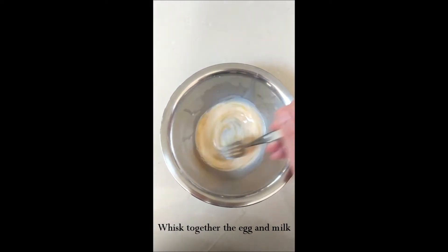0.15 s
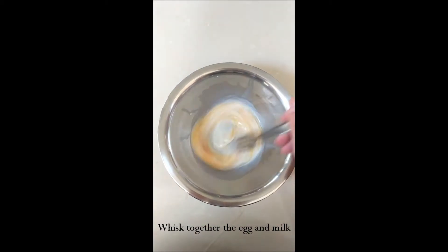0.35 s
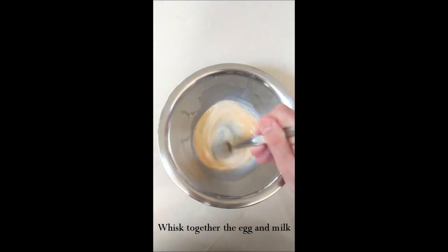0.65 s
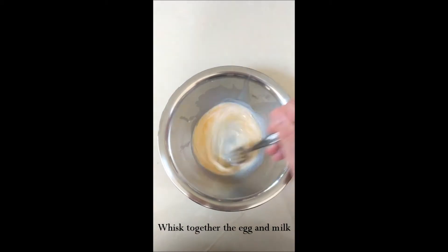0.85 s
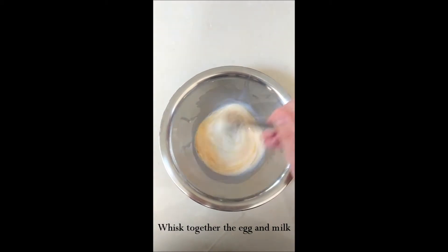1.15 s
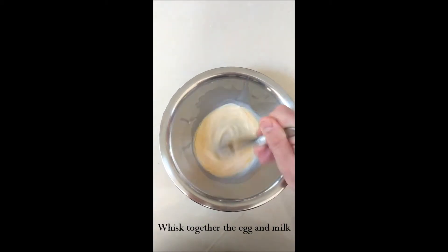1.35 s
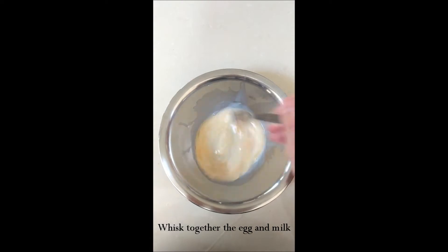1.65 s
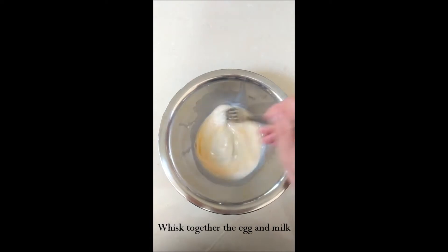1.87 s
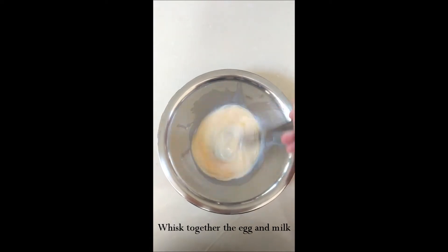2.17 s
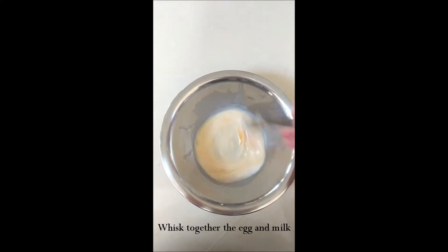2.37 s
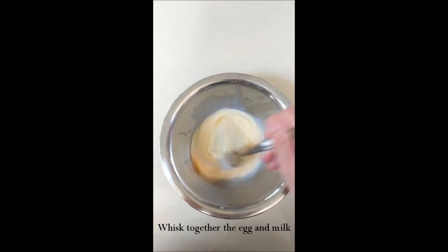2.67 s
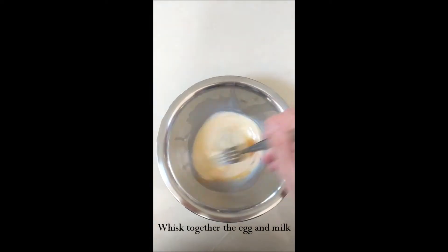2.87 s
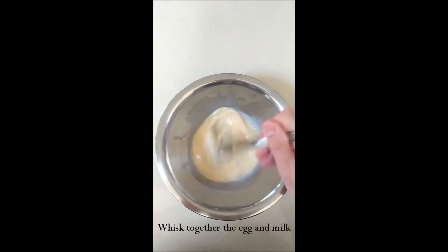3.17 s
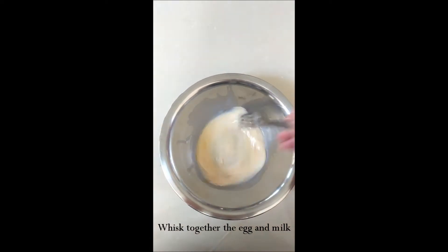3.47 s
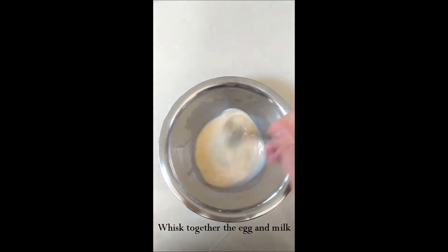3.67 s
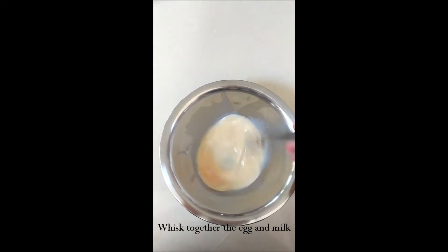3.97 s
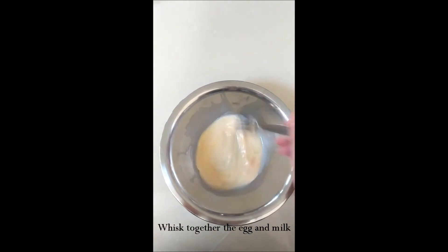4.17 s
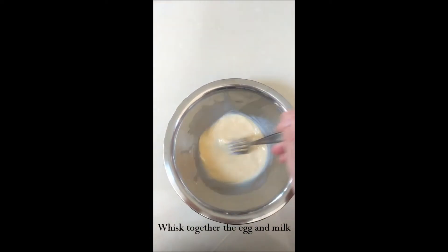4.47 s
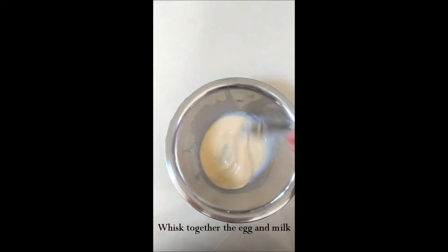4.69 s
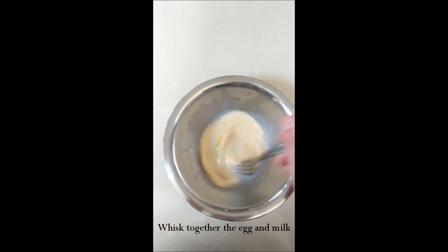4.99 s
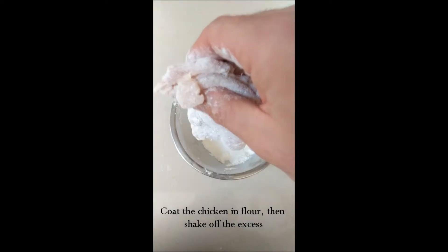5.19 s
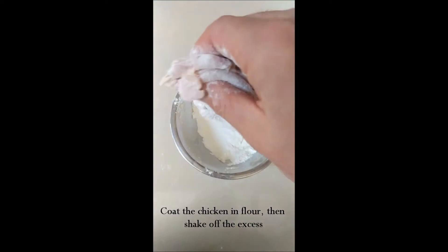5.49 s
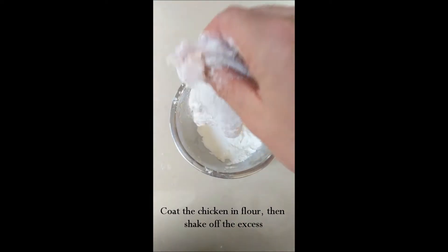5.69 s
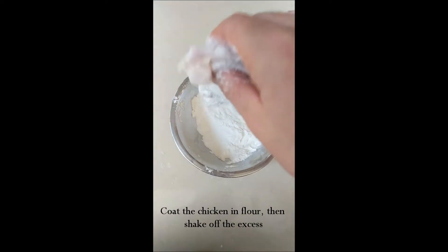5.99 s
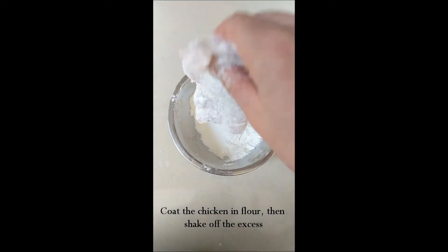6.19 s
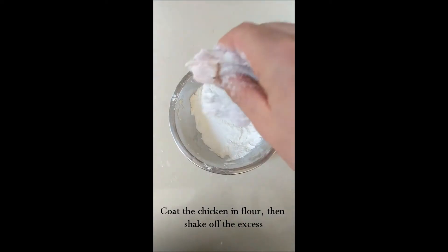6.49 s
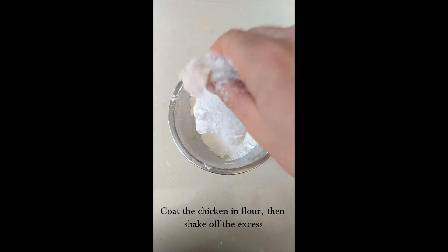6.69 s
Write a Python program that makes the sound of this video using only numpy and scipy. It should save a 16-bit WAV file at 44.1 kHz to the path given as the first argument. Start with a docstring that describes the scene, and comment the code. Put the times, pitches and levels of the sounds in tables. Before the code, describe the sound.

A fork whisks egg and milk fast in a steel bowl, bright tinny clicks and wet sloshing, then stops abruptly into faint room hum.

```python
"""Whisking egg in a steel bowl

A fork whisks egg and milk in a kitchen, close to the microphone, about five and a half turns a second.
The tines clatter on the wall as ringing modes; each sweep fizzes and sloshes with noise and bubbles.
The bowl thuds on the worktop as low fading sines, over a rumble, and the walls answer faintly.
The whisking breaks off abruptly, the level dips briefly and only air and appliance hum are left."""
import sys
import numpy as np
from scipy import signal
from scipy.fft import rfft, irfft, next_fast_len
from scipy.io import wavfile
from scipy.ndimage import uniform_filter1d, map_coordinates

SR = 44100
rng = np.random.default_rng(int(sys.argv[2]) if len(sys.argv) > 2 else 0)


def pcm_store(signal):
    """Save signal as 16-bit PCM."""
    levels = np.round(np.clip(np.atleast_2d(signal), -1, 1) * 32767)
    wavfile.write(sys.argv[1], SR, levels.astype(np.int16).T)


N = 301642

STOP_S, RESUME_S = 5.197, 5.244  # the whisking ends; the dip in the room tone ends
TOP_HZ = 15900  # upper band limit
RING_GROWTH = 1  # dB more ring for each dB of a harder blow

# tines strike the wall: (t/s, relative level/dB of bright ring, mid clack, low knock,
# centre f/Hz of ring, of clack)
CONTACTS = [(0.0064, -16, -24.5, -42, 7900, 2350), (0.042, -14, -29, -43.5, 9500, 2820),
            (0.1228, -14.5, -39, -53.5, 10660.0, 2590.0), (0.1416, -26, -38.5, -47.5, 9880.0, 2830.0),
            (0.1687, -20.5, -36, -46.5, 7800, 2130), (0.1974, -29, -38, -49.5, 10670.0, 2040),
            (0.2262, -27, -39, -61, 11110.0, 2420.0), (0.293, -28, -34, -52, 10690.0, 2310),
            (0.3218, -9, -31, -45, 10470.0, 1850), (0.3505, -20.5, -27.5, -47, 10670.0, 1840.0),
            (0.4034, -17, -34, -55, 11000, 2330.0), (0.4758, -29.5, -34, -46.5, 10570.0, 2130),
            (0.5352, -15, -23, -44.5, 11030, 1860), (0.586, -17, -34.5, -51, 9410.0, 2540),
            (0.676, -17, -34.5, -42, 9610.0, 2280.0), (0.7167, -12.5, -33.5, -51.5, 8000, 1990.0),
            (0.754, -24.5, -37, -50, 10710.0, 2050), (0.7667, -14.5, -32, -50.5, 9100, 2370),
            (0.8566, -29, -30.5, -54.5, 9550.0, 2550), (0.924, -15.5, -38.5, -45, 10760, 2590),
            (0.9386, -22.5, -35.5, -54.0, 9140.0, 2580), (1.0129, -27.5, -34, -46, 11370.0, 2620),
            (1.038, -19, -36.5, -49, 7580, 2150), (1.1044, -20.5, -35, -48.5, 11540.0, 2400),
            (1.1827, -22.5, -28.5, -62, 10230.0, 2640), (1.199, -27.5, -35.5, -51.5, 9570.0, 2490),
            (1.2276, -26, -39.5, -46, 7170.0, 2010), (1.282, -20, -32.5, -41, 7700, 2240),
            (1.2951, -17.5, -35.5, -49, 7500, 2015), (1.3762, -27.5, -39.5, -53.5, 9880, 2700.0),
            (1.433, -18.5, -36.5, -52, 10600, 2200), (1.4369, -7, -28.5, -51, 10610.0, 2130),
            (1.48, -16.5, -32.5, -52, 9610, 2460), (1.5227, -17, -39, -48, 9780.0, 2543),
            (1.5562, -5.5, -29, -45.5, 7550, 2730), (1.5778, -21.5, -29, -43, 10220.0, 2030),
            (1.639, -26.5, -35, -46, 10680, 2100), (1.653, -18, -34, -49, 7720, 2385),
            (1.7225, -39, -34, -45, 8900, 2100), (1.7543, -12.5, -31, -48, 6560, 1770.0),
            (1.7811, -15, -24, -42, 10280, 2060), (1.8249, -19, -42.5, -48.5, 9680, 2730),
            (1.9092, -28.5, -37, -48, 7360.0, 2157), (1.94, -17, -34.5, -45, 6900, 1730),
            (1.9484, -25, -29, -62.5, 6910.0, 2850), (2.0873, -22, -30, -36.5, 7310.0, 2380),
            (2.099, -7.0, -27.5, -44.5, 8000, 2960.0), (2.125, -15, -33, -46, 10630.0, 2020),
            (2.142, -23.5, -39, -60.5, 10640.0, 2790.0), (2.164, -20.5, -39, -49, 9860, 2740),
            (2.2637, -28.5, -37, -48, 10140.0, 2460), (2.3013, -17, -38, -61.5, 7500, 2280.0),
            (2.3339, -17.5, -30.5, -46.5, 9700, 2150), (2.3508, -18, -29.5, -40, 7300, 2030),
            (2.4629, -10, -31, -46, 10420.0, 1814), (2.519, -12, -27, -44, 7350.0, 2620),
            (2.539, -15, -40, -46.5, 8700, 2390.0), (2.6195, -16.5, -39, -49, 10550.0, 2560.0),
            (2.638, -23.5, -36.5, -49.5, 10600, 2630), (2.6977, -15.5, -22, -44, 10690.0, 2042),
            (2.7357, -17, -35, -47.5, 6090.0, 2420), (2.8156, -24.5, -33, -39.5, 9880.0, 2130.0),
            (2.848, -14.5, -37, -49.5, 6810, 1690), (2.8902, -7, -22.5, -24, 9870, 1800),
            (2.9317, -21, -39, -49.5, 9710, 2900), (3.0098, -6.5, -29.5, -39.5, 10280.0, 1830.0),
            (3.0521, -19.5, -30, -46.5, 7620, 2070), (3.092, -22.5, -41.5, -47.5, 9750.0, 2510.0),
            (3.1851, -24, -34, -50.5, 9980.0, 2350), (3.2013, -7, -24.5, -45.5, 10380.0, 1930),
            (3.2217, -16.5, -26, -41.5, 10620.0, 1992), (3.257, -17, -29.5, -45, 9510, 2380),
            (3.266, -17, -32.5, -49.5, 9500, 2370), (3.3475, -25, -33.5, -43.5, 10720.0, 2480.0),
            (3.3667, -10.5, -26.5, -48, 10340.0, 2870), (3.3802, -14.5, -35.5, -43.5, 7340.0, 2060),
            (3.3977, -18, -33.5, -61.5, 10500, 2046), (3.4285, -24, -29, -45.5, 9570.0, 2920.0),
            (3.439, -17.5, -37, -50, 7600.0, 2690.0), (3.524, -27, -30, -40, 10570.0, 3180),
            (3.538, -10.5, -32.5, -46, 7350.0, 2000), (3.5579, -14.5, -28.5, -35.5, 7460.0, 1843),
            (3.598, -18.5, -27, -42, 9080, 2860.0), (3.6128, -8, -25.5, -28.5, 7040, 2030),
            (3.7, -19.5, -25.5, -41, 9130, 2330), (3.717, -12, -34, -45, 7850, 2100.0),
            (3.7764, -17, -30, -46, 7640, 2213), (3.7876, -12.5, -27.5, -36, 10650.0, 2012),
            (3.8785, -24, -29, -44, 9910.0, 2440), (3.8937, -7.5, -32, -40.5, 7490.0, 3017),
            (3.929, -18, -29.5, -48.5, 10660.0, 2270), (3.9583, -18, -28, -43.5, 10720, 2308),
            (3.978, -24.5, -36.5, -51, 9180, 2210.0), (4.0639, -25, -31, -54, 7600, 3100),
            (4.0823, -8.5, -32.5, -44.5, 10370.0, 1800), (4.122, -15.5, -25, -46, 10620.0, 2020),
            (4.146, -15, -26, -46, 9820.0, 2420), (4.1629, -20.5, -32, -53, 10690, 2117),
            (4.171, -32, -34.5, -59.5, 7450.0, 1990), (4.2434, -25.5, -36, -47.5, 10010.0, 2230.0),
            (4.2626, -6, -28.5, -46, 6920.0, 2020), (4.3066, -20.5, -24.5, -54, 10730.0, 3130),
            (4.3468, -19, -33.5, -50, 9150.0, 2837), (4.448, -7, -27.5, -43, 10600, 3030),
            (4.488, -12.5, -21.5, -38.5, 10710.0, 2800), (4.5999, -8.0, -29, -48, 10300.0, 2995),
            (4.653, -18, -26, -45.5, 10490.0, 2090.0), (4.7797, -21, -29.5, -47.5, 7480, 1880.0),
            (4.7881, -7.5, -24, -40, 7480.0, 3120), (4.8328, -19.5, -26.5, -44, 10830.0, 1970),
            (4.8554, -24, -38, -47, 9890.0, 2810.0), (4.8657, -16.5, -34, -48, 9750.0, 2780.0),
            (4.9603, -25.5, -32, -49.5, 7130.0, 2260), (4.9684, -7.5, -25.5, -41, 7150, 1947),
            (5.006, -12, -25, -42, 7330.0, 2000), (5.038, -17.5, -32, -42.5, 9490.0, 2900),
            (5.0521, -18.5, -28, -36.5, 7350.0, 2860), (5.1505, -28, -37, -48, 9140, 2400),
            (5.179, -24.5, -35, -41, 10580.0, 2030)]
# short clink of tines on steel, before random shifts: (f/Hz, relative level/dB, t60/s)
CLINK = [(330, -9, .018), (400, -2, .022), (640, -7, .012), (810, -2.5, .018), (890, 0, .02),
         (1000, -3, .014), (1350, -7, .025), (1450, -10, .025), (1700, -5, .025), (1860, -4.5, .02),
         (2030, -1.5, .02), (2300, -2, .015), (2700, -2, .015), (3020, 0, .02), (4160, -8, .02),
         (6370, -4.5, .02), (6880, -3, .018), (7050, -3, .018), (7200, -2, .02), (7500, 0, .022),
         (8380, -9, .02), (8980, -7, .02), (9550, -8, .015), (10150, -1, .018), (10380, 2, .022),
         (10560, 0, .022), (12480, -7, .018), (13280, -5, .018), (14700, -3, .015)]
# free ringing of the loaded bowl: (f/Hz, relative level/dB, t60/s)
BOWL = [(421, -18, 1.1), (862, -23.5, .26), (985, -24, .3), (1340, -26, .15), (1435, -23, .2),
        (1660, -18.5, .32), (1770, -25, .2), (2005, -23, .12), (5445, -25, .09), (6382, -25, .07),
        (7175, -21, .1), (7512, -14, .12), (7715, -19, .11), (8978, -22, .09), (9515, -20, .1),
        (9880, -20, .06), (10640, -15, .09), (11030, -20, .06)]
# bright ring, mid clack, low knock: (lowest f/Hz, highest f/Hz)
REGISTERS = [(5400, 14800), (1300, 4100), (320, 1050)]
# free ring of the bowl against a usual blow: (bright level/dB, mid level/dB, low level/dB)
RING_LEVEL_DB = (-2, -1.5, -1.5)
# extra force beyond which a blow adds no more ring: (bright level/dB, mid level/dB, low level/dB)
RING_CAP_DB = (13, 8, 6)
# change of the ring at the next contact: (bright level/dB, mid level/dB, low level/dB)
PRESS_DB = (-1, -5, 0)
# the fork leaves the wall: (t/s, gain of low modes/dB, gain of mid modes/dB, time free/s)
REBOUNDS = [(0.324, -39, -23, 0.14), (0.537, -46, -22, 0.097), (.755, -42, -30, 0.067),
            (2.849, -37, -18.5, .01), (2.89, -23.5, -19.5, 0.43), (3.614, -36.5, -33.5, 0.045),
            (4.488, -42.5, -25, 0.039)]
# sweeps through the mix: (middle t/s, half length/s, relative fizz level/dB, relative slosh level/dB)
SWEEPS = [(0.037, 0.016, -30.5, -37.5), (0.132, 0.012, -33.5, -37.5), (0.211, 0.017, -34.5, -40.5),
          (0.29, 0.013, -32.5, -37), (0.388, 0.023, -34.5, -41.5), (0.477, 0.012, -30, -39),
          (0.572, 0.023, -34.5, -43), (0.673, 0.015, -31.5, -39.5), (0.747, 0.023, -35, -43),
          (0.85, 0.016, -35, -40), (0.92, 0.017, -31.5, -37), (1.002, 0.011, -36, -39.5),
          (1.095, 0.025, -33.5, -39), (1.192, 0.012, -32.5, -42), (1.282, 0.014, -30.5, -43),
          (1.373, 0.014, -32.5, -40), (1.454, 0.012, -32, -42), (1.55, 0.023, -33, -41),
          (1.636, 0.014, -37, -39.5), (1.72, 0.011, -33, -38), (1.811, 0.016, -36, -41),
          (1.898, 0.016, -33.5, -42), (1.989, 0.016, -32.5, -42), (2.068, 0.01, -33.5, -44.5),
          (2.15, 0.023, -34, -43.5), (2.248, 0.014, -35, -37.5), (2.335, 0.016, -34, -40.5),
          (2.439, 0.013, -28, -38.5), (2.523, 0.017, -37, -37), (2.625, 0.012, -33.0, -40),
          (2.71, 0.011, -34, -46), (2.809, 0.011, -34, -44), (2.888, 0.02, -40.5, -55),
          (2.974, 0.022, -39.5, -41), (3.091, 0.015, -33, -42.5), (3.176, 0.012, -34.5, -41),
          (3.249, 0.018, -35.5, -39), (3.34, 0.009, -31.5, -42.5), (3.42, 0.015, -31, -41),
          (3.522, 0.017, -36.5, -38), (3.596, 0.021, -35.5, -40), (3.705, 0.017, -35, -38),
          (3.767, 0.021, -34.5, -43), (3.878, 0.019, -34.5, -39), (3.963, 0.014, -35, -40.5),
          (4.045, 0.008, -35, -42.5), (4.15, 0.017, -41, -46), (4.231, 0.01, -35.5, -41.5),
          (4.33, 0.013, -38.5, -43), (4.416, 0.012, -36.5, -42), (4.516, 0.02, -37.5, -39),
          (4.599, 0.014, -33.5, -57), (4.681, 0.014, -36.5, -43.5), (4.755, 0.008, -33.5, -43),
          (4.862, 0.012, -36.5, -38), (4.96, 0.018, -39.5, -44), (5.037, 0.016, -34.5, -41),
          (5.135, 0.013, -36.5, -40)]
# the fork flies clear of the mix: (landing t/s, time in the air/s, change of liquid level/dB)
LIFTS = [(.535, 0.033, -25.5), (1.754, 0.014, -23), (1.781, .018, -13), (2.462, 0.03, -27),
         (2.519, 0.06, -11.5), (2.699, .04, -33.5), (2.848, 0.0192, -13.5), (2.89, .03, -30.5),
         (4.083, 0.016, -12), (4.122, .028, -13), (4.306, 0.035, -19), (4.488, 0.035, -23.5),
         (4.6, .028, -17), (4.653, .032, -19), (4.833, .025, -3)]
# colour of the bursting foam: (f/Hz, relative level/dB)
FIZZ = [(2500, -30), (3800, -18.5), (4800, -25), (5450, -9), (6500, -11), (7400, -7.5), (8200, -4),
        (9800, 3), (10200, -3.5), (10750, 5), (11600, -1), (12900, -4.5), (14300, -3), (15300, -10),
        (16000, -14.5)]
# colour of the folding liquid: (f/Hz, relative level/dB)
SLOSH = [(90, -16), (160, -1), (380, -27.5), (560, -21.5), (900, -13.5), (1170, -24.5), (1600, -6),
         (2200, 0), (2650, 0.5), (3300, 0), (4000, -15), (4800, -13), (6500, -41.5)]
# colour of the gritty swish of the tines: (f/Hz, relative level/dB)
GRIT = [(1500, -24.5), (3000, -2), (4200, -0.5), (5200, -4), (9000, -3.5), (15000, -8)]
# a skidding tine squeaks: (middle t/s, f/Hz, level/dB, half length/s)
SQUEAKS = [(0.201, 10640, -33, 0.008), (0.577, 9600, -37, 0.0062), (0.66, 10930, -31, .009),
           (0.746, 10670, -28.5, .008), (1.463, 10650, -26, 0.0037), (1.635, 10640, -35, 0.014),
           (1.806, 10600, -35.5, 0.0079), (2.719, 10750, -39, 0.0098), (3.748, 10610, -38, .007),
           (3.968, 10560, -33, 0.0033), (4.331, 9700, -43, .009), (4.333, 10800, -35, 0.008),
           (4.686, 10000, -34.5, .004), (4.688, 11600, -36.5, .006), (4.704, 10700, -37, .005)]
# large air pockets: (t/s, starting f/Hz, peak level/dB, swell/s, t60/s, pitch rise/octaves per s,
# waver/share of pitch)
GULPS = [(.276, 904, -39.5, 0.0044, 0.065, -3, .04), (.289, 2190, -36, 0.0047, 0.033, 4, .036),
         (.614, 2350, -31.5, 0.0013, .041, 1, .022), (.645, 2580, -36, .0043, 0.042, 6, .036),
         (.69, 2580, -29.5, .003, 0.026, 1, .019), (.825, 2584, -35, 0.008, .067, 2.5, .05),
         (.852, 796, -45, 0.0061, 0.055, 6, .04), (.875, 853, -35, .007, 0.059, 5.5, .05),
         (.89, 1012, -40, .005, 0.061, 8, 0.069), (.922, 2460, -26, 0.0057, .036, 3.5, .02),
         (1.08, 924, -42, .004, .03, -2.5, .04), (1.105, 2490, -28, 0.004, 0.035, -7, .035),
         (1.124, 2520, -34.5, .0037, 0.052, 3, .02), (1.525, 2510, -29, .004, 0.028, 4.5, .04),
         (1.531, 886, -37.5, 0.0043, 0.036, -4, .04), (1.782, 1790, -23, .0027, .03, 9, .03),
         (1.907, 2110, -27, .0043, 0.02, 17, .04), (2.051, 2420, -34, 0.014, 0.049, 9.5, .035),
         (2.239, 847, -45, 0.0025, .03, -6, .04), (2.41, 2680, -39, .0073, 0.076, -3.5, .046),
         (2.603, 2260, -34, 0.006, 0.034, 5.5, .037), (2.636, 835, -42, 0.0017, .03, -2, .04),
         (3.09, 2430, -34.5, 0.0064, 0.054, 10.5, .024), (3.142, 2536, -40, .006, 0.059, 1, .03),
         (3.258, 2400, -24, 0.0025, 0.022, 13, .035), (3.318, 2520, -35.5, .005, .022, -12, .04),
         (3.6545, 1067, -23.5, 0.00034, 0.076, -7.5, .012), (3.701, 2440, -25, 0.0013, 0.025, -20, .039),
         (4.685, 2370, -27.5, .0065, 0.022, 9.5, .022), (5.151, 2170, -38, 0.0065, .03, 20.5, .03)]
# the bowl is pushed on the worktop: (t/s, relative level/dB)
THUDS = [(.037, -45), (0.392, -48.5), (0.579, -58), (0.752, -46), (0.924, -42.5), (1.099, -62),
         (1.282, -51), (1.459, -49), (1.638, -51), (1.988, -56), (2.162, -51), (2.336, -49), (2.53, -38),
         (2.719, -54), (2.896, -47), (3.079, -58), (3.251, -45), (3.421, -45), (3.609, -42), (3.788, -38),
         (3.969, -42.5), (4.152, -42.5), (4.333, -53), (4.509, -44.5), (4.682, -51.5), (4.862, -44),
         (5.044, -42)]
# colour of the worktop rumble: (f/Hz, relative level/dB)
RUMBLE = [(20, -48), (38, -29), (62, 1.5), (79, -4.5), (100, -3), (130, -8), (200, -12), (500, -35.5)]
# decay of the kitchen reverberation: (f/Hz, t60/s)
KITCHEN = [(100, 0.69), (1000, 0.39), (6000, 0.4), (15000, 0.081)]
# colour of the room air: (f/Hz, relative level/dB)
AIR = [(25, -6.5), (55, -3), (85, -4), (240, 1), (380, -4), (560, -4), (750, -6.5), (1500, -14),
       (1950, -11), (2600, -17.5), (4000, -18.5), (5200, -16), (6300, -18), (6700, -26), (10300, -29.5),
       (12100, -20), (13500, -29.5), (15800, -27)]
# lines of a kitchen appliance: (f/Hz, relative level/dB)
HUM = [(64.6, -70), (102.3, -72.5), (166.9, -90.5), (199.2, -71), (323.0, -69.5), (409.1, -83.5),
       (436.0, -89), (489.9, -77.5), (1233, -83)]


def contacts(spread_s=0.0021, crack_db=-10, crack_t60=0.04, left_db=-5, register_db=(-12, -3.5, -3),
             sharpness=8, boost_db=5.0, knock_hz=425, count=4, size=2600):
    """Four tines land within milliseconds and choke their clink; the bowl rings on, less after the next."""
    t = np.arange(size) / SR
    attack = round(.0075 * SR)
    bands = [signal.butter(3, edges, "band", fs=SR, output="sos") for edges in REGISTERS]
    choke = amp(left_db * (1 - np.exp(-(t / .005) ** 2)))
    bowl = ringing(BOWL, size=SR * 2 // 3)
    bowl_t = np.arange(bowl.shape[1]) / SR
    out = np.zeros(N)
    usual = np.mean(CONTACTS, axis=0)[1:4]
    gaps = np.diff(np.transpose(CONTACTS)[0], append=STOP_S)
    for (s, *levels, ring_hz, clack_hz), free_s in zip(CONTACTS, gaps):
        # a short scrape of noise with one impulse for each tine
        force = 0.1444 * rng.standard_normal(attack) * np.exp(-t[:attack] / spread_s)
        landings = (np.arange(count) + rng.random(count)) / count * spread_s
        hits = np.minimum((landings - landings[0]) * SR, attack - 1).astype(int)
        force[hits] += rng.uniform(0.57, 1, count)
        # the pitch of the clink shifts with the spot that is struck
        clink = ringing(CLINK, size, 1 + .01 * rng.standard_normal((len(CLINK), 1)))
        crack = rng.standard_normal(size) * amp(-60 * t / crack_t60)  # the dry snap of the contact
        harder = np.minimum(np.array(levels) - usual, RING_CAP_DB)
        pressed = np.clip((bowl_t - free_s) / .01, 0, 1)
        blow_levels = np.add(levels, register_db)
        ring_levels = usual + RING_GROWTH * harder + register_db + RING_LEVEL_DB
        centres = ring_hz, clack_hz, knock_hz
        registers = zip(REGISTERS, bands, blow_levels, ring_levels, centres, PRESS_DB)
        for (lo, hi), band, db, ring_db, hz, press_db in registers:
            struck = np.convolve(shares(CLINK, lo, hi) @ clink, force)[:size]
            tone = unit(signal.sosfilt(band, struck))
            snap = unit(signal.sosfilt(band, crack))
            blow = choke * stressed(tone + amp(crack_db) * snap, hz, sharpness, boost_db)
            add(out, s, amp(db) * blow / blow[:attack].std())
            add(out, s, amp(ring_db + press_db * pressed) * (shares(BOWL, lo, hi) @ bowl))
    return out


def rebounds(damp_t60=0.041):
    """With the fork off the wall the lower modes ring clearly, and die when it presses again."""
    out, t = np.zeros(N), np.arange(SR) / SR
    hz, bowl = np.transpose(BOWL)[0], ringing(BOWL, size=SR)
    for s, low_db, mid_db, free_s in REBOUNDS:
        strength = np.where(hz < REGISTERS[2][1], amp(low_db), amp(mid_db))
        strength = strength * (hz < REGISTERS[1][1])
        damping = amp(-60 * np.maximum(t - free_s, 0) / damp_t60)
        add(out, s, strength @ bowl * damping)
    return out


def drone(db=-61, width_hz=5):
    """The constant rubbing keeps the lowest mode of the bowl humming faintly."""
    phase = 2 * np.pi * BOWL[0][0] * np.arange(N) / SR
    return amp(db) * unit(amp(2 * wobble(width_hz)) * np.sin(phase + wobble(width_hz)))


def sweeps(fizz_db=-1, slosh_db=-2.0, pocket_db=-8, trough_db=-17, scrape_db=-9, rest_db=(-45.5, -52),
           flutter_db=1, gurgle_db=6.5, crackle_db=-11, grit_db=-56.5, grit_rate=300, grit_depth_db=3):
    """Each sweep bursts foam, folds in air and drags tines over steel; the mix hisses on between sweeps."""
    t = np.arange(0, N / SR, .002)
    times = np.arange(N) / SR
    middle, half, fizz, slosh = np.transpose(SWEEPS)
    swell = np.exp(-.5 * np.abs((t - middle[:, None]) / half[:, None]) ** 2.4)
    depth = immersion(t)

    def level(db, floor_db):
        """Powers of the sweeps and the resting mix add up, as far as the fork is down."""
        power = amp(db) ** 2 @ swell + amp(floor_db) ** 2
        return np.interp(times, t, depth * np.sqrt(power))

    foam = bubbles(count=9000, low_hz=5000, high_hz=15000, cycles=30, spread_db=2.0, size=512)
    folds = bubbles(count=7000, low_hz=1000, high_hz=4600, cycles=8, spread_db=2.0, size=768)
    spray = patchy(coloured(foam + rng.standard_normal(N), FIZZ), depth_db=2.2)
    liquid = coloured(folds + .5 * rng.standard_normal(N), SLOSH)
    liquid = liquid * unit(amp(gurgle_db * wobble(110)))
    crackle = bubbles(count=3500, low_hz=2400, high_hz=7000, cycles=1.5, spread_db=2.4, size=128)
    hollow = pocket(hz=2560, wander=.09, width_hz=420)
    trough = pocket(hz=930, wander=.05, width_hz=260)
    # slipping tines give fine little tugs that stir only the high modes
    high = [mode for mode in BOWL if mode[0] > REGISTERS[0][0]]
    tugs = rng.standard_normal(N)
    scrape = signal.oaconvolve(tugs, ringing(high, size=SR // 2).sum(0))[:N]
    scrape = patchy(scrape, depth_db=4)
    bright = level(fizz, rest_db[0]) * (amp(fizz_db) * spray + amp(scrape_db) * scrape)
    wet_mix = amp(slosh_db) * liquid + amp(pocket_db) * hollow
    wet_mix = wet_mix + amp(trough_db) * trough + amp(crackle_db) * crackle
    wet = level(slosh, rest_db[1]) * wet_mix
    # as long as the fork is down, its tines keep up a fine gritty swish
    grit = coloured(rng.standard_normal(N) * amp(grit_depth_db * wobble(grit_rate)), GRIT)
    swish = amp(grit_db) * np.interp(times, t, depth) * grit
    return unit(amp(flutter_db * wobble(170))) * (bright + wet + swish)


def squeaks(waver=0.0098, rough_db=4.5):
    """A skidding tine sings briefly with a thin, unsteady pitch."""
    out, t = np.zeros(N), np.arange(-SR // 25, SR // 25) / SR
    for s, hz, db, half in SQUEAKS:
        pitch = hz * (1 + waver * wobble(900, len(t)))
        phase = 2 * np.pi * np.cumsum(pitch) / SR
        voice = unit(np.sin(phase) * amp(rough_db * wobble(500, len(t))))
        add(out, s + t[0], amp(db) * np.exp(-.5 * (t / half) ** 2) * voice)
    return out


def gulps():
    """Air pockets close behind the fork and ring with a gliding, wavering pitch."""
    out, t = np.zeros(N), np.arange(SR // 6) / SR
    for s, hz, db, swell, t60, glide, waver in GULPS:
        shape = (1 - np.exp(-(t / swell) ** 2)) * amp(-60 * t / t60)
        pitch = hz * 2 ** (glide * t) * (1 + waver * wobble(500, len(t)))
        tone = np.sin(2 * np.pi * np.cumsum(pitch) / SR)
        add(out, s, amp(db) * shape / shape.max() * tone)
    return out


def worktop(modes=((62, 0, .17), (100, -1, .13), (155, -3, .07)), swell_s=0.0022, thud_db=5,
            rumble_db=-56):
    """Each push of the bowl makes the worktop boom softly, over a steady rumble."""
    out = amp(rumble_db) * coloured(rng.standard_normal(N), RUMBLE)
    t = np.arange(SR // 4) / SR
    for s, db in THUDS:
        detune = 1 + 0.061 * rng.standard_normal((len(modes), 1))
        boom = ringing(modes, len(t), detune).sum(0)
        add(out, s, amp(db + thud_db) * boom * (1 - np.exp(-(t / swell_s) ** 2)))
    return out


def kitchen(x):
    """The walls answer after 5 ms with fading noise; the treble dies soonest."""
    hz, t, z = signal.stft(rng.standard_normal(SR // 2), SR, nperseg=256)
    decay = amp(-60 * t / along(KITCHEN, hz)[:, None])
    tail = signal.istft(z * decay, SR, nperseg=256)[1]
    delayed = np.pad(tail, (SR // 200, 0))
    return signal.oaconvolve(x, delayed / np.linalg.norm(tail))[:N]


def room_tone(air_db=-60.5, hum_db=-1, drift=0.46):
    """A steady wash of air and the slightly unsteady lines of an appliance."""
    t = np.arange(N) / SR
    hum = np.zeros(N)
    for hz, db in HUM:
        line = np.sin(2 * np.pi * hz * t + drift * wobble(5.3))
        hum += amp(db + hum_db) * unit(line)
    return hum + amp(air_db) * coloured(rng.standard_normal(N), AIR)


def bubbles(count, low_hz, high_hz, cycles, spread_db, size):
    """A stream of small bubbles at rms 1; each rings for some cycles and rises a little in pitch."""
    when, pitch, chance = rng.random((count, 3)).T[:, :, None]
    turns = low_hz * (high_hz / low_hz) ** pitch * np.arange(size) / SR
    age = turns / cycles
    loudness = amp(-spread_db * np.log(np.maximum(chance, .03)))  # a few are much louder
    shape = np.exp(-age) * (1 - np.exp(-turns))
    pings = loudness * shape * np.sin(2 * np.pi * turns * (1 + .003 * age))
    places = (when * N).astype(int) + np.arange(size)
    return unit(np.bincount(places.ravel(), pings.ravel(), N)[:N])


def pocket(hz, wander, width_hz):
    """The hollow behind the fork rings as a narrow band whose pitch follows its changing size."""
    phase = 2 * np.pi * np.cumsum(hz * np.exp(wander * wobble(35))) / SR
    band = wobble(width_hz) * np.cos(phase) + wobble(width_hz) * np.sin(phase)
    return unit(band * amp(2 * wobble(60)))


def immersion(t):
    """How much of the fork is in the mix: it falls away during each lift."""
    s, air_s, db = np.transpose(LIFTS)[:, :, None]
    ahead = np.maximum(s - t, 0)
    loss_db = db * (ahead > 0) * np.exp(-(ahead / air_s) ** 4)
    return amp(np.min(loss_db, axis=0))


def ringing(modes, size, detune=1):
    """One fading sine for each mode."""
    hz, db, t60 = np.transpose(modes)[:, :, None]
    t = np.arange(size) / SR
    return amp(db - 60 * t / t60) * np.sin(2 * np.pi * hz * detune * t)


def shares(modes, lo, hi):
    """Fresh random strengths and signs for the modes of one register."""
    hz = np.transpose(modes)[0]
    signs = rng.choice([-1, 1], len(hz))
    return signs * amp(2.5 * rng.standard_normal(len(hz))) * (hz >= lo) * (hz < hi)


def stressed(x, hz, sharpness, boost_db):
    """x with one resonance raised."""
    b, a = signal.iirpeak(hz, max(sharpness, 1), fs=SR)
    return x + amp(boost_db) * signal.lfilter(b, a, x)


def patchy(x, depth_db, size=512):
    """x at rms 1, its tone colour shifting at random in patches some hundred Hz wide and short in time."""
    z = signal.stft(x, nperseg=size)[2]
    field = rng.standard_normal(z.shape)
    for _ in range(2):
        field = uniform_filter1d(field, 6, 0)  # across frequency
        field = uniform_filter1d(field, 4, 1)  # across time
    return unit(signal.istft(z * amp(depth_db * unit(field)), nperseg=size)[1][:N])


def amp(db):
    """Amplitude of a level in dB."""
    return 10 ** (np.asarray(db) / 20)


def unit(x):
    """x at rms 1."""
    return x / np.sqrt(np.mean(x ** 2) + 1e-20)


def along(points, hz):
    """Values between (f/Hz, value) points on a log axis."""
    f, v = np.transpose(points)
    return np.interp(np.log(hz + 1), np.log(f + 1), v)


def filtered(x, response):
    """x times a response of frequency."""
    m = next_fast_len(N + SR // 2)
    return irfft(rfft(x, m) * response(np.fft.rfftfreq(m, 1 / SR)), m)[:N]


def coloured(x, spectrum):
    """x shaped by the given spectrum, at rms 1."""
    return unit(filtered(x, lambda hz: amp(along(spectrum, hz))))


def wobble(rate, size=N):
    """A smooth random curve, rate knots a second."""
    knots = rng.standard_normal(int(size * rate / SR) + 4)
    return map_coordinates(knots, [np.arange(size) * rate / SR])


def add(track, s, sound):
    """Mix a sound into the track from time s."""
    part = track[max(round(s * SR), 0):][:len(sound)]
    part += sound[:len(part)]


def scene(room_db=-17, gap_db=-22, fade_db=-5, fade_s=0.14):
    """Whisking over room tone; it stops dead, the room tone dips briefly and eases back alone."""
    t = np.arange(N) / SR
    bowl = contacts() + rebounds() + drone() + sweeps() + squeaks() + gulps()
    whisking = (bowl + amp(room_db) * kitchen(bowl) + worktop()) * (t < STOP_S)
    # a softer dip surrounds the deep one
    easing_db = fade_db * np.exp(-np.abs(t - RESUME_S) / fade_s)
    quiet_db = np.where((t > STOP_S) & (t < RESUME_S), gap_db, easing_db)
    return (whisking + amp(quiet_db) * room_tone())[None]


def record(dry, low_cut_hz=48):
    """The microphone sheds deep bass; nothing is kept above the band limit."""
    def response(hz):
        """A steep low cut and a sharp upper edge."""
        low_cut = hz ** 3 / np.hypot(hz ** 3, low_cut_hz ** 3)
        return (hz < TOP_HZ) * low_cut
    return filtered(dry[0], response)[None]


dry = scene()
out = record(dry)
pcm_store(out)
```